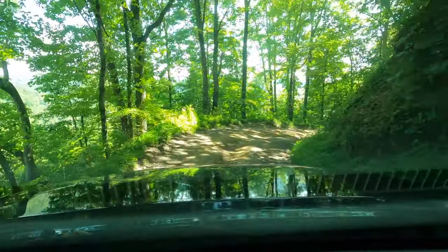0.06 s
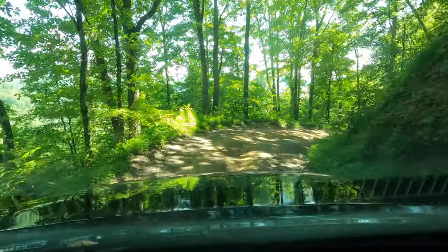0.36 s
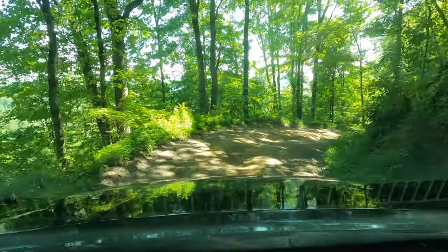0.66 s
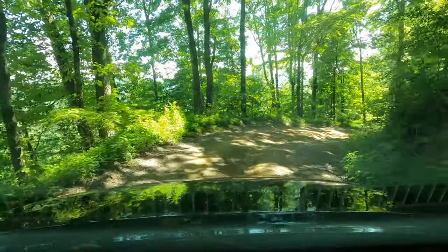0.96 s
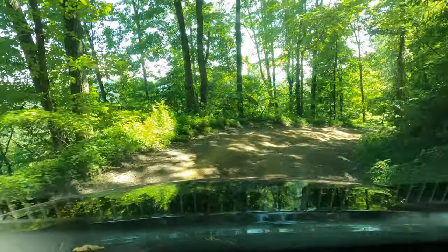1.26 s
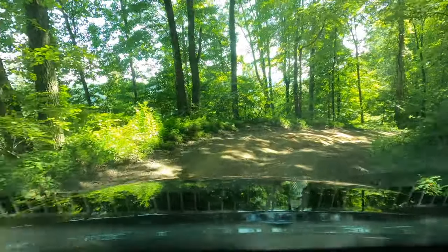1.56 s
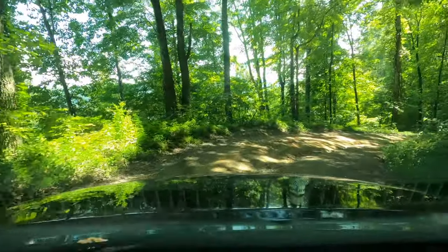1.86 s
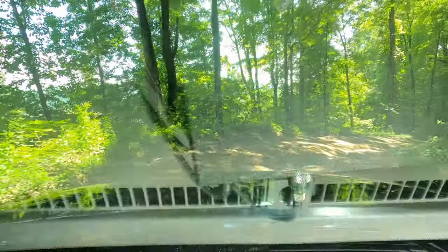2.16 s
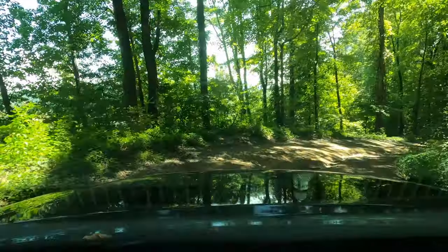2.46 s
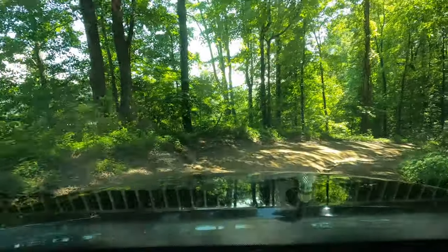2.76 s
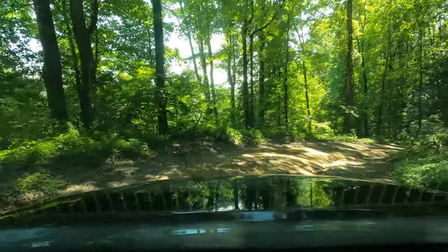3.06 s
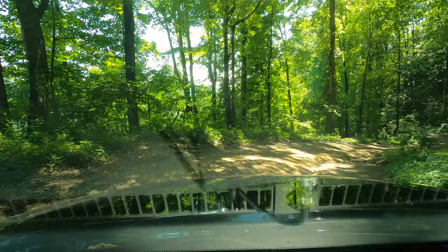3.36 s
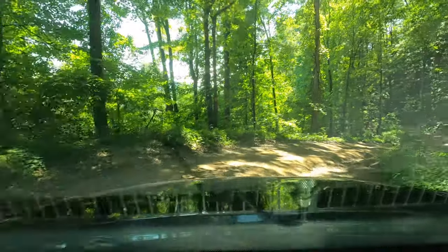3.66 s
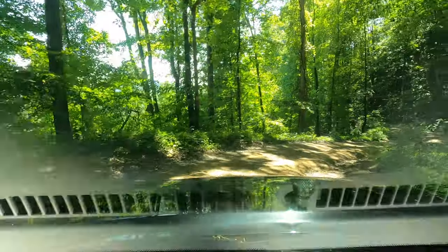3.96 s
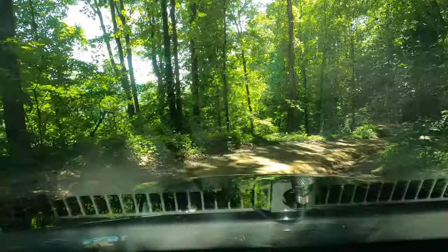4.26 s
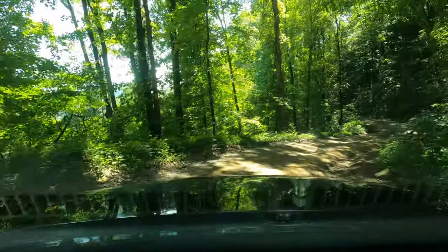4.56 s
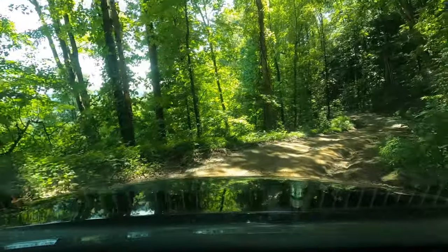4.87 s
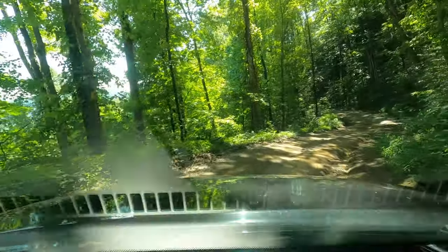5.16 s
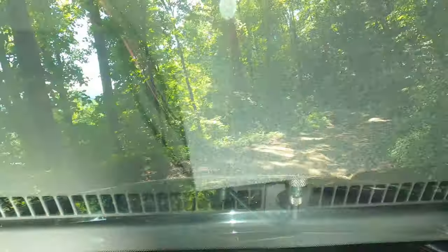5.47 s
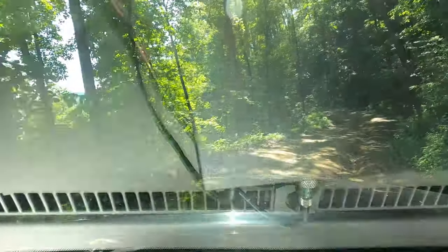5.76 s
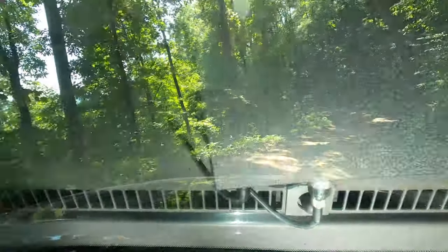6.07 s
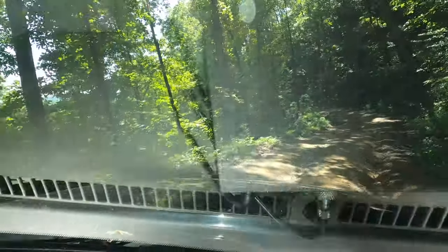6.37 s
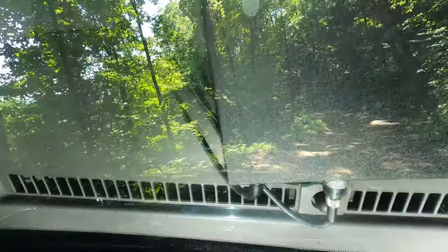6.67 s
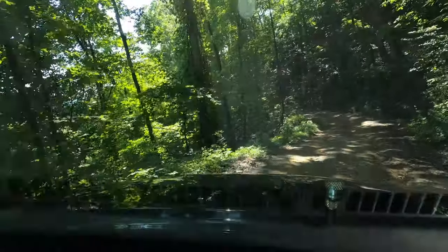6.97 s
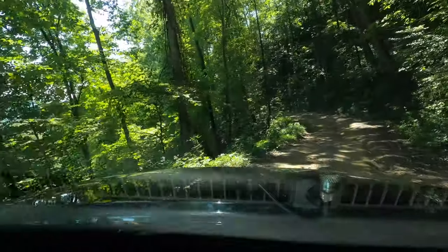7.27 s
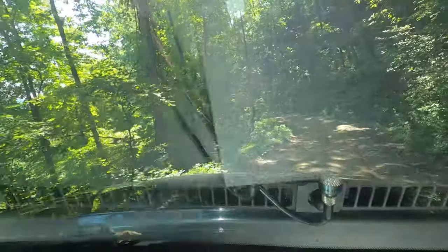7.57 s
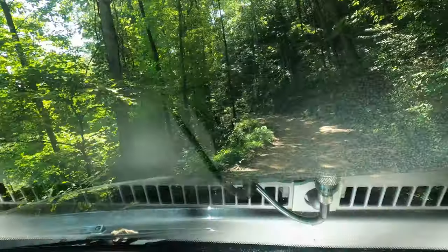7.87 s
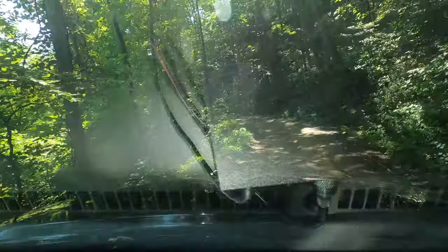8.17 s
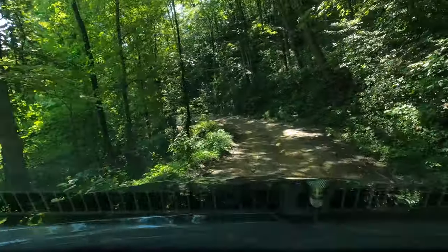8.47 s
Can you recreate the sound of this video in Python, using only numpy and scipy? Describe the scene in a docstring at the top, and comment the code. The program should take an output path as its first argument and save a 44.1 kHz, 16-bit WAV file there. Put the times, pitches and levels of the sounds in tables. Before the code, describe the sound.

Inside a truck creeping over a bumpy dirt trail, with low engine and tyre rumble, hollow knocks, rattles and two booming jolts.

```python
"""Inside a truck's cab on a rutted forest trail, windows up, microphone on the dashboard.
Close by, loose parts knock, plastic trim clacks and small things tick, each ringing in its own modes.
Twice a wheel drops into a rut: the body booms through the suspension and the whole cab rattles.
Behind it all the truck creeps on: tyres rumble and crunch under the floor, and the idling engine's
firings boom in the cab's air."""
import sys
import numpy as np
from scipy import signal
from scipy.fft import rfft, irfft, next_fast_len
from scipy.io import wavfile
from scipy.ndimage import uniform_filter1d

SR = 44100
rng = np.random.default_rng(int(sys.argv[2]) if len(sys.argv) > 2 else 0)


def wrap_up_sound(samples):
    """Save the sound to the file named by the first command line argument, as 16-bit audio."""
    columns = np.atleast_2d(samples).T
    # keep every value between -1 and 1, then stretch to whole-number steps
    tamed = np.clip(columns, -1, 1)
    steps = np.round(tamed * 32767).astype(np.int16)
    wavfile.write(sys.argv[1], SR, steps)


N = 375291
TIME = np.arange(N) / SR
SIDES = np.array([[1], [-1]])  # left, right


# knocks: t/s, level/dB, centre f/Hz, left minus right/dB, chatter/dB, focus/(dB per octave)
PART_HITS = [(0.353, -23.5, 640, 1.5, -12, 4), (0.846, -37, 710, -2, -10, 27),
             (1.713, -38, 598, 5.5, -11, 21), (1.905, -16, 745, 0, -12.5, 7.5),
             (1.912, -14.5, 850, 2.5, -31, 7), (1.924, -22, 1046, 4, -7, 32),
             (1.972, -21.5, 880, 1.5, 9, 22.5), (2.031, -21.5, 573, 8, -12.5, 35),
             (2.079, -33, 980, -6, -25, 3), (2.218, -37, 746, -2.5, -4, 9), (2.545, -37, 600, -1, 2, -14),
             (2.7, -29.5, 730, 13, -12, 12), (2.712, -20.5, 720, 0, -11.5, 13.5),
             (3.064, -26, 724, -1, -15, 23), (3.209, -29.5, 595, 9, -30, 34.5),
             (3.702, -37, 715, 10, -21.5, 14), (3.768, -19, 760, -0.5, -26, 23),
             (3.914, -38, 641, 8, 4, -7), (4.207, -27.5, 714, -0.5, -17, 7), (4.244, -29.5, 617, 7, 1, 3),
             (4.255, -33.5, 940, -4.5, -19, 11), (4.426, -35.5, 681, 7, 1, 17),
             (4.957, -40, 732, -3.5, -11, 23), (5.701, -37.5, 665, 0, -17, 21),
             (5.912, -30, 680, -2.5, -2, 26), (5.944, -31.5, 920, -1, -7, -14),
             (5.962, -31.5, 730, 0, 4, 14), (6.02, -24.5, 717, 1, -20, 15), (6.182, -27, 616, 3, 24, 10),
             (6.409, -22, 624, -1.5, 2.5, 7.5), (6.429, -30, 740, 1, -12, 9),
             (6.454, -22.5, 734, 2.5, -6, 9), (6.496, -22, 670, -2, -2, 9), (6.656, -29, 960, 3, -14, 11),
             (6.971, -27.5, 760, 3, -12, 10), (7.228, -34, 689, 15, 16, 5),
             (7.69, -33.5, 980, 6, -15, 22.5), (7.748, -17.5, 659, 9, 5, -13.5), (7.784, -23, 725, 5, 4, 7),
             (8.041, -27.5, 980, 1, -6.5, 13), (8.234, -18.5, 680, -1, -28, 14.5)]
# the part's modes: f/Hz, level/dB, t60/s
PART_MODES = [(580.5, 1, 0.037), (668, 6.5, 0.028), (724, -2.5, 0.032), (818, -11, 0.043), (976, -7, 0.06),
              (1166, -10.5, 0.029), (1615, -22, 0.024), (2000, -30, 0.021)]

def knocks():
    """A loose part, close to the microphone, is struck and rings hollow."""
    return blows(PART_HITS, PART_MODES, rise_s=0.0024, chatter_s=0.012, spread=0.18, detune=0.015,
                 low_hz=577, crest_db=22, crack_db=-17.5, crack_hz=1240)


# jolts: t/s, level/dB, centre f/Hz, left minus right/dB, chatter/dB, focus/(dB per octave)
SUSPENSION_HITS = [(2.533, -36.5, 204, 2.5, -23, 6.5), (5.151, -46.5, 255, 1.0, -14, 15),
                   (5.616, -40, 180.4, 2.5, -16, 10), (5.725, -38.5, 126, 1, -15, 11),
                   (5.76, -36.5, 109, 1.5, 3, 7.5), (6.188, -33, 178, 1, -20, 3),
                   (6.303, -20.5, 208, -2.5, 4.5, 4), (6.325, -21, 111, -0.5, 3, 12),
                   (6.434, -29.5, 135, 1, -3.5, 9), (6.453, -27, 213, 1, -17, 3),
                   (6.987, -27.5, 290, 0, -3, 24.5), (7.711, -20, 230, 1, 3, 21),
                   (7.747, -18.5, 230, 5, -20, 6.5), (7.757, -12.5, 190, 1, 4.5, 16),
                   (7.796, -21.5, 160, 3.5, -1, 6.5), (7.846, -25.5, 134, 2.5, -7.5, 9.5)]
# the body's modes: f/Hz, level/dB, t60/s
TRUCK_MODES = [(34, -16, .3), (68, -18, 0.42), (115, -0.5, 0.098), (140.2, -10.5, 0.16), (168.5, -11, 0.14),
               (201.4, 1.5, 0.091), (232, 1, 0.083), (278.6, -4.5, 0.14), (295.8, 0.5, 0.083),
               (338, -7.5, 0.078), (412, -8, 0.25), (517, -7.5, 0.15), (588, 6.5, 0.053)]

def thumps():
    """Blows come up through the suspension and the body booms all around the microphone."""
    return blows(SUSPENSION_HITS, TRUCK_MODES, rise_s=0.0028, chatter_s=0.019, spread=0.03,
                 detune=0.0068, low_hz=24.1, crest_db=18, crack_db=-21, crack_hz=500)


# clacks: t/s, level/dB, centre f/Hz, left minus right/dB, chatter/dB, focus/(dB per octave)
TRIM_HITS = [(0.058, -48, 1250, 12, -20, 29), (0.889, -42, 1310, 4.5, -9, 18),
             (1.163, -42, 1030, -3, -5, 33), (1.709, -47.5, 2000, 9, 2, 36), (1.764, -44, 1500, 0, 11, 11),
             (1.799, -24, 1430, 1, -6.5, 35.5), (1.803, -31, 1290, -0.5, -4, 18),
             (1.968, -33, 1490, 3, -11, 34), (1.982, -32.5, 1480, -0.5, 1.5, 19.5),
             (2.112, -45, 1685, -2.5, -15, 27), (2.159, -34, 1390, 2, -20, 22.5),
             (2.169, -34.5, 1190, 0, -2, 17), (3.064, -39.5, 1380, 3, -1.5, 4),
             (4.207, -46.5, 1930, -2, -9.5, 55), (6.123, -50, 1400, 3, 0, 1),
             (6.459, -20.5, 1290, 3, -7, 2), (6.485, -30.5, 1650, 6, -2, 2),
             (6.575, -28, 1210, 5.5, -26, 17), (6.654, -42.5, 1190, 13, -21, 23),
             (6.97, -40.5, 1540, 0, 4, -1), (7.367, -28.5, 1460, -2, -16, 5.5),
             (7.372, -29, 1590, 6, -18, 17), (7.744, -34, 1210, 1, -2.5, -8.5),
             (7.754, -33, 1680, 17, -2, 11), (7.783, -33.5, 1440, 1, -5.5, -2),
             (7.905, -34, 1230, 4.5, 15.5, 4)]
# the trim's modes: f/Hz, level/dB, t60/s
TRIM_MODES = [(990, -5, 0.042), (1252, -2, 0.055), (1442, -1, 0.026), (1480, -2, 0.034), (1655, -2, 0.035),
              (1876, -7.5, 0.033), (2038, -8.5, 0.026), (2266, -3.5, 0.017), (2646, -14, 0.042),
              (3370, -22.5, 0.006)]

def clacks():
    """Nearby plastic trim is struck and rings hard and short."""
    return blows(TRIM_HITS, TRIM_MODES, rise_s=0.0024, chatter_s=0.017, spread=0.38, detune=0.018,
                 low_hz=850, crest_db=19, crack_db=-12.5, crack_hz=2200)


# ticks: t/s, level/dB, centre f/Hz, left minus right/dB, chatter/dB, focus/(dB per octave)
TRINKET_HITS = [(0.314, -54, 6000, 3.5, 0, 36), (0.885, -51.5, 4120, -1, -19, 27.5),
                (1.691, -57, 3560, 6, -2, 24), (1.901, -54, 3600, -5.5, 12.5, -2),
                (2.135, -40.5, 4770, 8, -2, 52), (2.226, -55, 3910, 18.5, -9, 17),
                (3.183, -52.5, 3970, 3, 2, 34), (3.905, -45, 4100, 1, -19, 23),
                (4.253, -59, 3100, 15, -16.5, 18), (4.313, -57, 3000, 11, -12.5, 37),
                (5.53, -56.5, 4400, 3, -1, 3), (6.214, -56, 3320, 10, 13, -16),
                (6.369, -56.5, 3900, 14, -17, 23), (6.427, -50, 5400, 9.5, -1, 37),
                (6.459, -30, 4400, 2, -4, 12), (6.514, -41.5, 3030, 7, -2, 11.5),
                (6.575, -30.5, 2570, 3, 2, 31), (6.617, -30, 3090, 3, -4, 9),
                (6.655, -40.5, 2750, 8, 9, 31), (6.838, -49.5, 3840, 11, -3, 16),
                (6.986, -32.5, 2810, 4, 6, 5), (7.101, -43, 6450, 3, -5, 31),
                (7.369, -37, 3930, -1, -6, 30), (7.668, -44, 3860, 11, 0, -2),
                (7.752, -45, 3000, 18.5, 17, 12), (7.781, -42, 3580, 12, 2, 31),
                (7.857, -50, 3140, 7, -5, 32), (7.918, -48, 3700, -2, -5, 11)]
# the small things' modes: f/Hz, level/dB, t60/s
TRINKET_MODES = [(2600, -3, .013), (3080, 0, .02), (3500, -4, .01), (3900, -2, .012), (4280, -1, .02),
                 (4550, -3, .012), (4900, -5, .012), (5450, -7, .01), (6300, -9, .012), (7200, -13, .01)]

def ticks():
    """Small loose things tap, mostly left of the microphone; their high modes die at once."""
    return blows(TRINKET_HITS, TRINKET_MODES, rise_s=0.0011, chatter_s=0.01, spread=0.65, detune=0.029,
                 low_hz=1900, crest_db=24, crack_db=-4.5, crack_hz=5470)


# chinks: t/s, level/dB, centre f/Hz, left minus right/dB, chatter/dB, focus/(dB per octave)
METAL_HITS = [(1.912, -46, 8700, 0, -10, 7.5), (2.134, -44, 8500, 7, -11, 26),
              (3.101, -54, 6950, 17, -8, 78), (6.459, -56, 7040, -9, 11, 14),
              (6.621, -35.5, 6960, 3, 8, 36), (6.987, -45, 7050, 5, 5, 13), (7.092, -52, 10000, 12, -2, 50),
              (7.749, -55, 7330, -9, -3, 10.5)]
# the metal's modes: f/Hz, level/dB, t60/s
METAL_MODES = [(5760, 4, 0.029), (6280, 1.5, 0.013), (7050, 3.5, 0.0089), (7600, -17, 0.0067),
               (8580, 0, 0.008), (8800, -8.5, 0.018), (9800, -12.5, 0.023)]

def chinks():
    """Small metal pieces touch and ring thinly, wide in the stereo image."""
    return blows(METAL_HITS, METAL_MODES, rise_s=0.0016, chatter_s=0.013, spread=1.0, detune=0.01,
                 low_hz=4960, crest_db=29.5, crack_db=-9, crack_hz=8500)


def contents():
    """Everything loose trembles as the truck rolls and clatters in the ruts, left of the microphone."""
    dull = rattle(PART_MODES, rate=600, scatter_db=4, spread=0.29)
    hard = rattle(TRIM_MODES, rate=500, scatter_db=5.5, spread=0.23)
    bright = lowpass(rattle(TRINKET_MODES, rate=600, scatter_db=5.5, spread=0.95, parts=6), hz=5000)
    tiny = rattle(METAL_MODES, rate=900, scatter_db=1.5, spread=0.73)
    fits = undb(3.5 * walk(rate_hz=45.23))
    light = (undb(-8.5) * hard + undb(-22.5) * bright + undb(-37.5) * tiny) * fits
    tremble = undb(effort_db(CRUNCH) - 5)
    return (undb(-2) * dull + light) * np.hypot(ruts(SHAKE), tremble) * undb(1.5 * SIDES)


def strays():
    """Now and then one loose thing in the cab stirs on its own, louder on rougher ground."""
    dull = rattle(PART_MODES, rate=5.8, scatter_db=2.5, spread=0.26)
    hard = undb(-9) * rattle(TRIM_MODES, rate=5, scatter_db=4, spread=0.4)
    bright = undb(-18.5) * rattle(TRINKET_MODES, rate=4.9, scatter_db=-1.5, spread=0.8)
    return (dull + hard + bright) * undb(effort_db(CRUNCH) - 10 + 2 * SIDES)


RUMBLE, CRUNCH, SHAKE, T60 = 1, 2, 3, 4  # columns of the next two tables
# a wheel meets a rut or stone: t/s, rumble/dB, crunch/dB, shaking of contents/dB, t60/s
TRAIL_RUTS = [(0.3, -64, -66, -59, 0.7), (1.15, -60, -63.5, -61, 2.3), (1.71, -64.5, -54, -63.5, 0.8),
              (1.93, -49.5, -65, -50, 0.94), (2.18, -50, -62, -55, 0.6), (4.43, -49.5, -63.5, -55, 1.0),
              (6.3, -47, -72, -68, 0.8), (6.47, -40, -39.5, -46, 0.85), (6.61, -57, -55, -53, 0.2),
              (6.9, -55, -55, -59.5, 1.2), (7.25, -50.5, -57, -55, 1.5), (7.758, -40, -45, -33, 0.67),
              (7.88, -42.5, -48.5, -48, 0.98)]

def ruts(column, rise_s=0.023):
    """Gain that swells quickly at each rut and settles exponentially; overlaps add in power."""
    power = 0
    for rut in TRAIL_RUTS:
        since = TIME - rut[0]
        swell = np.exp(-(np.minimum(since, 0) / rise_s) ** 2)
        settle = undb(rut[column] - 60 * np.maximum(since, 0) / rut[T60])
        power = power + swell * settle ** 2
    return np.sqrt(power)


# how hard the tyres work on the trail: t/s, rumble/dB, crunch/dB
TYRE_EFFORT = [(0.0, -54, -59.5), (1.58, -57.5, -60.5), (2.03, -55, -54.5), (2.49, -57, -60.5),
               (4.5, -57, -61), (5.25, -62.5, -65), (6.03, -55, -60), (6.46, -39, -53.5),
               (6.67, -51.5, -53.5), (7.72, -57.5, -60), (7.88, -56.5, -53.5), (8.21, -57, -59.5),
               (8.5, -60.5, -61)]

def effort_db(column):
    """The tyres' effort glides from point to point along the trail."""
    points = np.array(TYRE_EFFORT)
    return np.interp(TIME, points[:, 0], points[:, column])


# spectra of the tyres' rumble, the dirt and the hiss: f/Hz, relative level/dB
RUMBLE_SPECTRUM = [(18, -11.5), (35, -17), (55, -9), (90, -11.5), (140, -1.5), (260, -2.5), (350, -5),
                   (470, -13.5), (700, -25.5), (1500, -58), (6000, -97)]
DIRT_SPECTRUM = [(200, -34.5), (450, -3.5), (700, 0), (1000, -5.5), (1500, -20), (2200, -20.5),
                 (4000, -20.5), (7000, -20), (11000, -72)]
HISS_SPECTRUM = [(200, -1), (500, -1.5), (700, -7), (1000, 0.5), (1600, -10.5), (2300, -17), (4200, -29),
                 (6800, -35), (8200, -40.5), (11000, -52.5)]

def tyres():
    """Rumble booms in the cab and dirt crunches under the floor, swelling in ruts over a steady hiss."""
    boom = lambda f: 1 + sum(undb(db) * resonance(f, hz, width) for hz, width, db in AIR_MODES)
    rumble = unit(shape(noise(RUMBLE_SPECTRUM, wide_hz=3500), boom)) * undb(2.1 * walk(15))
    rumble *= np.hypot(undb(effort_db(RUMBLE) - 2), ruts(RUMBLE))
    dirt = noise(DIRT_SPECTRUM, wide_hz=2400) * undb(-2.5 + 2.57 * walk(22) + 1.1 * walk(4))
    pebbles = undb(-7.5) * rattle(PART_MODES, rate=120, scatter_db=9, spread=0.16)
    grit = undb(-11) * rattle(TRIM_MODES, rate=60, scatter_db=3, spread=0.73)
    crunch = lowpass(dirt + pebbles + grit, hz=3600)  # muffled by the floor pan
    crunch *= np.hypot(undb(effort_db(CRUNCH) - 2), ruts(CRUNCH))
    hiss = undb(-64.5) * noise(HISS_SPECTRUM, wide_hz=2400)
    return (rumble + crunch + hiss) * undb(0.5 * SIDES)


# modes of the cab's air: f/Hz, width/Hz, level/dB
AIR_MODES = [(37.2, 13, -1), (63, 20, 2), (111.1, 22, 0.5), (199, 37, -7.5)]

def engine(firing_hz=39.3, level_db=-60, load_share=0.3):
    """In the background, uneven idle firings boom in the cab, a little louder as the tyres work harder."""
    firings = np.cumsum(firing_hz * (1 + .04 * walk(3.4))) / SR
    pulses = np.diff(np.floor(firings), prepend=0) * undb(4.9 * rng.standard_normal(N))
    boom = lambda f: sum(undb(db) * resonance(f, hz, width) ** 2 for hz, width, db in AIR_MODES)
    effort = effort_db(RUMBLE)
    return unit(shape(pulses, boom)) * undb(level_db + load_share * (effort - effort.mean()))


def cab(x, wet_db, width, t60_s=0.17):
    """Reflections from glass and trim close to the microphone; the seats soak up the treble."""
    t = TIME[:SR // 2]
    mid, side = rng.standard_normal((2, len(t))) * undb(-60 * t / t60_s) * (t > .005)
    echoes = (mid + width * side * SIDES) / np.linalg.norm(mid)
    wet = signal.fftconvolve(x, echoes, axes=1)[:, :N]
    return x + undb(wet_db) * shape(wet, lambda f: 1 / (1 + 1j * f / 4500))


def blows(hits, modes, rise_s, chatter_s, spread, detune, low_hz, crest_db, crack_db, crack_hz):
    """Each blow is a push and a brief chatter of the contact, ringing the modes, with a noisy crack."""
    out, t = np.zeros((2, N)), TIME[:SR // 4]
    rise = 1 - np.exp(-(t / rise_s) ** 2)
    crack_decay = undb(-60 * t / 0.061)
    for s, db, centre_hz, pan_db, chatter_db, focus_db in hits:
        force = rng.standard_normal(len(t)) * np.exp(-t / chatter_s)
        force *= undb(chatter_db) / np.linalg.norm(force)
        force[0] += 1  # the push
        body = ring(modes, t, centre_hz, focus_db, spread, detune) * rise
        ringing = signal.fftconvolve(body, force[None], axes=1)[:, :len(t)]
        crack = rng.standard_normal((2, len(t)))
        crack = shape(crack, lambda f: 1 / (1 + (f / crack_hz) ** 4) / (1 + (low_hz / f) ** 4))
        crack = shape(crack, lambda f: undb(-max(focus_db, 0) * np.abs(np.log2(f / centre_hz))))
        hit = unit(ringing) + undb(crack_db) * unit(crack * rise * crack_decay)
        hit = unit(hit) * undb(db - crest_db + SIDES * pan_db / 2)  # crest_db: from peak down to rms
        start = int(s * SR)
        out[:, start:start + len(t)] += hit[:, :N - start]
    # a part radiates little below its lowest mode
    return shape(out, lambda f: 1 / (1 + (low_hz / f) ** 10))


def rattle(modes, rate, scatter_db, spread, parts=4):
    """Random tiny collisions, about `rate` a second, shared among a few parts of like build."""
    out, t = 0, TIME[:SR // 10]
    rise = 1 - np.exp(-(t / 0.00065) ** 2)
    for _ in range(parts):
        when, force, direction = rng.random((3, N))
        strength = undb(scatter_db * np.minimum(-np.log(1 - force), 3))
        taps = (when < rate / parts / SR) * np.sign(direction - .5) * strength
        body = ring(modes, t, centre_hz=1, focus_db=0, spread=spread, detune=0.055) * rise
        out = out + signal.oaconvolve(body, taps[None], axes=1)[:, :N]
    return unit(out)


def ring(modes, t, centre_hz, focus_db, spread, detune):
    """Decaying modes, focus_db weaker per octave off centre; spread parts left and right in phase."""
    hz, db, t60 = np.transpose(modes)[:, :, None]
    offset, uneven, lead = rng.standard_normal((3, len(modes), 1))
    octaves = np.abs(np.log2(hz / centre_hz))
    envelope = undb(db + 3.06 * uneven - focus_db * octaves - 60 * t / t60)
    phase = 2 * np.pi * hz * (1 + detune * offset) * t
    shift = spread * (lead - .4)
    return np.array([np.sum(envelope * np.sin(phase + side * shift), axis=0) for side in (1, -1)])


def noise(spectrum, wide_hz):
    """Coloured stereo noise: the bass nearly alike in both channels, the treble wide."""
    hz, db = np.transpose(spectrum)
    colour = lambda f: undb(np.interp(np.log(f), np.log(hz), db))
    mid, side = shape(rng.standard_normal((2, N)), colour)
    side = shape(side, lambda f: np.minimum(0.026 + f / wide_hz, .9))
    return unit(mid + side * SIDES)


def walk(rate_hz):
    """Random levels held 1 / rate_hz seconds and smoothed twice; rms 1."""
    hold = int(SR / rate_hz)
    steps = np.repeat(rng.standard_normal(N // hold + 1), hold)
    return unit(uniform_filter1d(uniform_filter1d(steps, hold), hold)[:N])


def shape(x, response):
    """Filter by a function of frequency."""
    size = next_fast_len(x.shape[-1] + 4096)
    f = np.maximum(np.arange(size // 2 + 1) * SR / size, 1)
    return irfft(rfft(x, size) * response(f), size)[..., :x.shape[-1]]


def lowpass(x, hz):
    """Roll off 24 dB per octave above hz."""
    return shape(x, lambda f: 1 / (1 + (f / hz) ** 4))


def resonance(f, hz, width):
    """Response of one resonance, gain 1 at its centre."""
    return 1 / (1 + 1j * (f / hz - hz / f) * hz / width)


def undb(db):
    """Decibels to gain."""
    return 10 ** (np.asarray(db) / 20)


def unit(x):
    """Scale to rms 1."""
    return x / np.sqrt(np.mean(x ** 2))


def scene():
    """At the dashboard: loose parts close by in the small cab, over the body, engine and tyres."""
    struck = knocks() + clacks() + ticks() + chinks()
    body = thumps()
    return cab(struck + contents() + strays(), wet_db=-12.5, width=0.4) + body + engine() + tyres()


def record(dry):
    """The phone on the dashboard cuts the treble above 10.6 kHz."""
    return signal.sosfilt(signal.ellip(8, .2, 70, 10600, fs=SR, output="sos"), dry)


dry = scene()
out = record(dry)
wrap_up_sound(out)
```